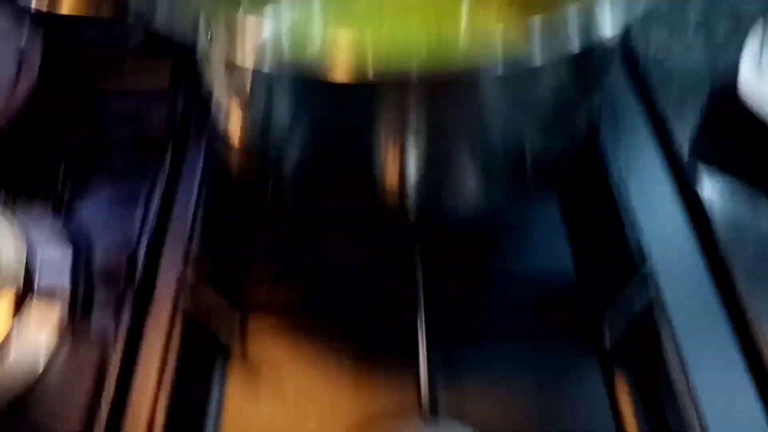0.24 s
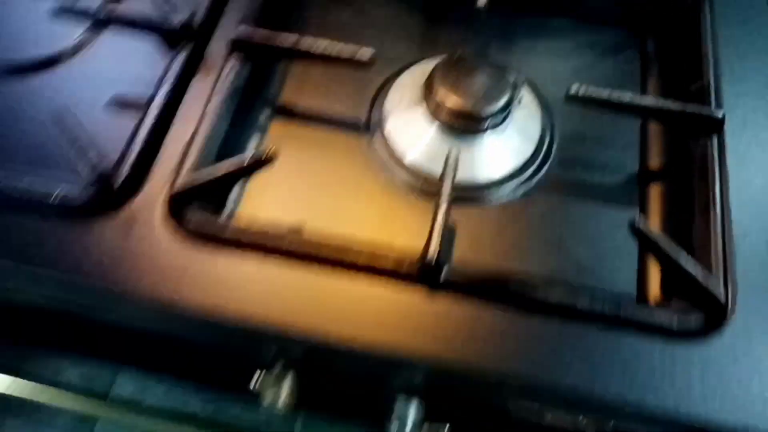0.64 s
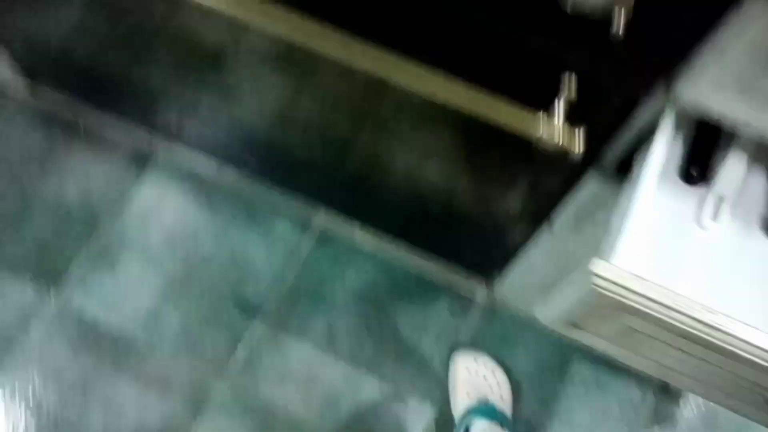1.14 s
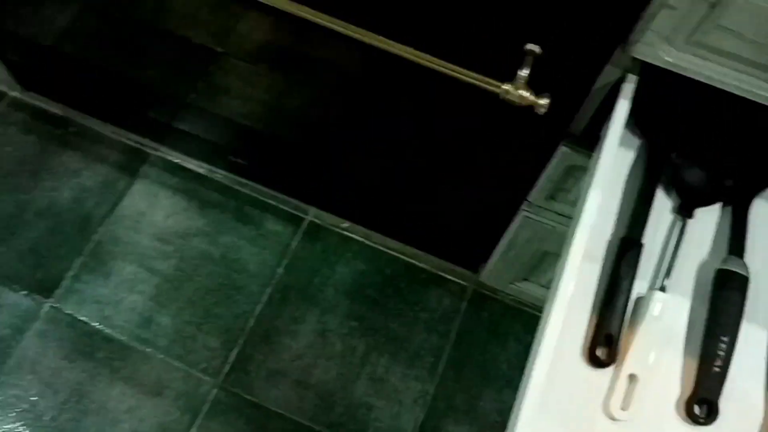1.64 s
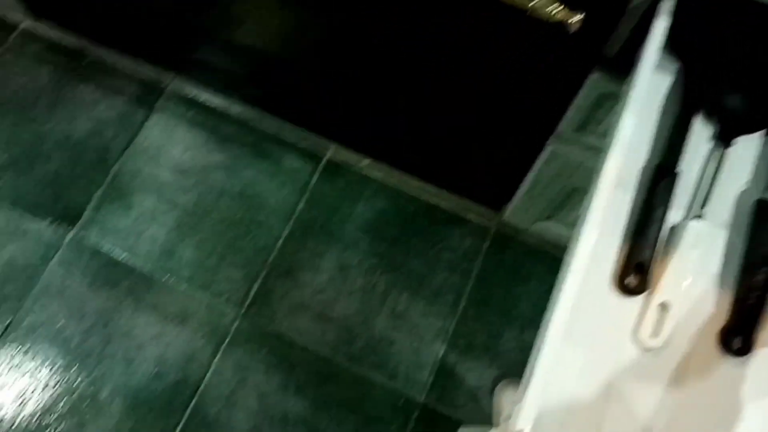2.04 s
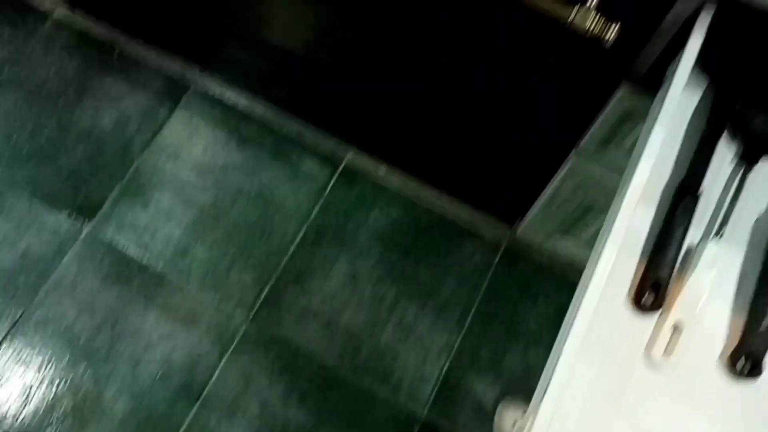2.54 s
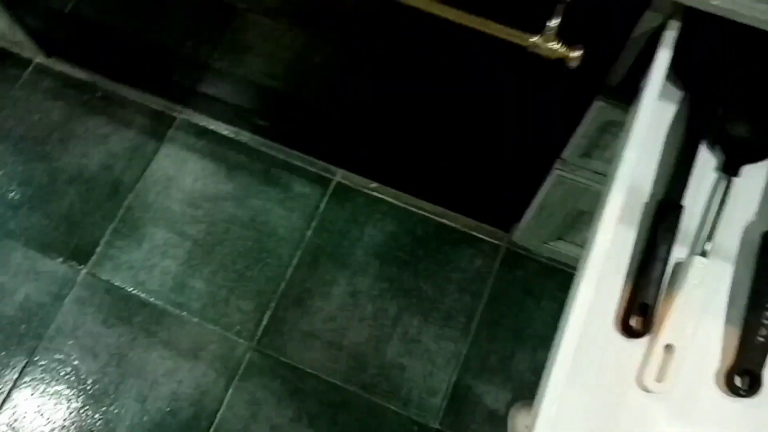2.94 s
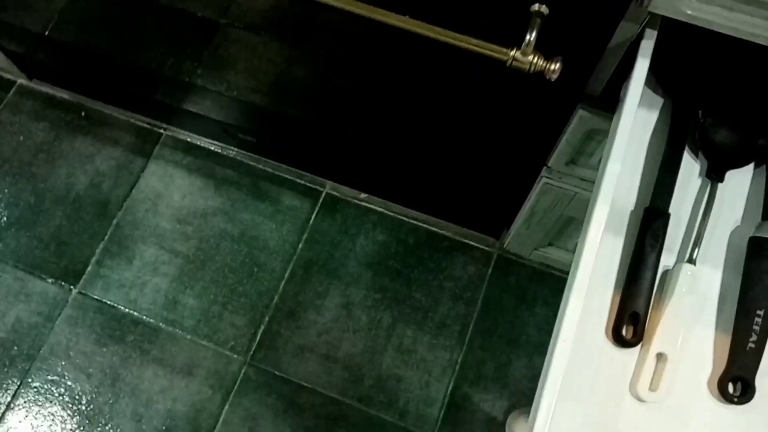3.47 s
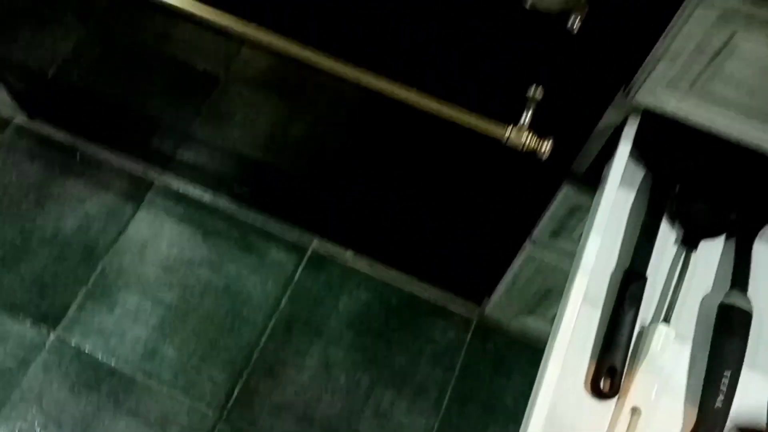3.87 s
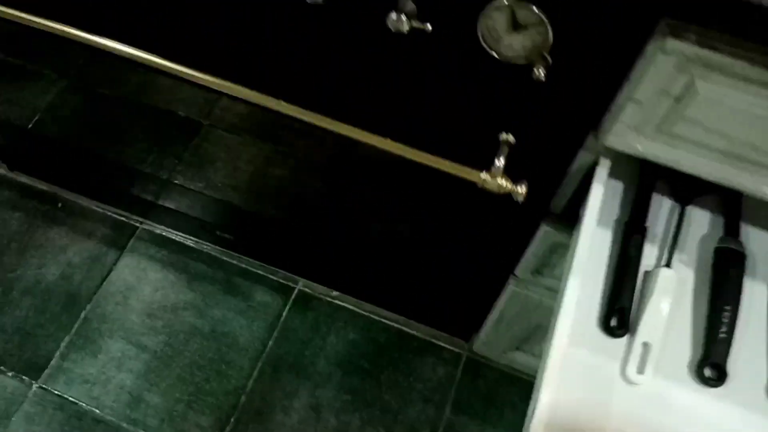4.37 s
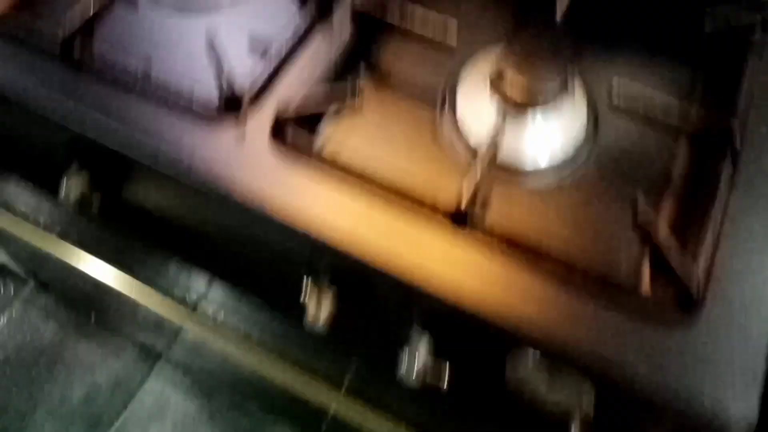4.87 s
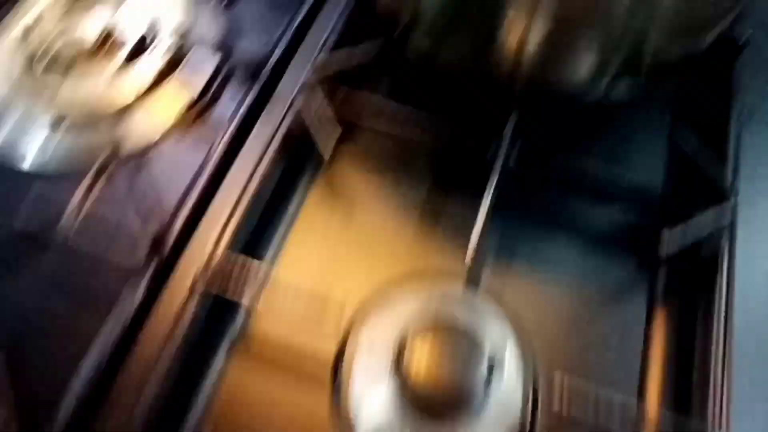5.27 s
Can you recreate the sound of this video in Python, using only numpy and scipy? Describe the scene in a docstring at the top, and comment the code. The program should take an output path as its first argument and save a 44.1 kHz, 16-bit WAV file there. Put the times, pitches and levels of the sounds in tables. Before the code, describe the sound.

In a tiled kitchen with a low electrical hum and faint simmering, a hollow knock sounds and a drawer whirrs open on rollers, jolting to a stop with a clash of utensils. After a pause, a hand rummages lightly in the plastic tray and something is knocked down on wood. The drawer rolls back with more clatter and bumps shut. A hand-held phone picks it up nearby.

```python
"""A tiled kitchen, with a mains hum and a faintly simmering pot, heard by a hand-held phone.
A drawer whirrs open on its rollers and jolts against its stop; utensils slide, clack and clash in their
plastic tray. A hand rummages, something is knocked down on wood, and the drawer rolls back, jolts and
bumps shut with a short hollow clatter. Hits are noise bursts and ringing modes of wood and steel;
friction is a crowd of tiny contacts, and the rollers are narrow noise round a moving pitch."""
import sys
import numpy as np
from scipy import signal
from scipy.fft import rfft, irfft
from scipy.io import wavfile
from scipy.ndimage import uniform_filter1d

SR = 44100
rng = np.random.default_rng(int(sys.argv[2]) if len(sys.argv) > 2 else 0)


def master_out(mix):
    """Clip the mix to full scale and print it as 16-bit PCM to the path in sys.argv[1]."""
    frames = np.transpose(np.atleast_2d(mix))
    ceiling = np.clip(frames, -1, 1)
    pcm = np.round(ceiling * 32767).astype(np.int16)
    wavfile.write(sys.argv[1], SR, pcm)


N = 242991
TIME = np.arange(N) / SR

# room tone, soft air: (frequency [Hz], relative level [dB])
AIR_SPECTRUM = [(25, 2), (70, -8.5), (140, -1.5), (180, -2.5), (225, 5.5), (280, -4), (500, -4),
                (1000, -11.5), (2000, -20), (3500, -27.5), (16000, -33.5)]
# thin hiss on top: (frequency [Hz], relative level [dB])
HISS_SPECTRUM = [(1500, -15), (3500, -5.5), (5200, -1.5), (6500, 9.5), (7900, -7.5), (9300, 8.5),
                 (11000, -3), (13800, -14), (15200, 0.5)]
# a pot simmering on the hob: (frequency [Hz], relative level [dB])
SIMMER_SPECTRUM = [(500, -4), (2600, 5), (4100, 2), (6500, 3), (9000, -1.5), (16000, -33)]
# reverb tail of the tiles: (frequency [Hz], t60 [s])
KITCHEN_DECAY = [(120, 0.67), (400, 0.42), (780, 0.87), (2500, 0.63), (7000, 0.62), (15000, 0.28)]
# EQ of the phone's muffled left port: (frequency [Hz], gain [dB])
LEFT_PORT_EQ = [(50, -10), (100, -0.2), (160, -5.5), (500, -2), (1500, -1), (4000, -1.5), (7000, -3.5),
                (9000, -9.5), (11000, -24.5), (16000, -30)]

# raps of something small, hard and hollow: (time [s], ring [dB], click [dB], sustain [x base t60])
HOLLOW_RAPS = [(.651, -9, -12.5, 2.2), (3.545, -12, -20, .7), (5.202, -11, -23, 1), (5.211, -8.5, -21, 1),
               (5.228, -14, -21, 1)]
# its body: (frequency [Hz], relative level [dB], base t60 [s])
HOLLOW_MODES = [(1128, 9.5, 0.015), (1312, -1, 0.067), (1440, -6.5, 0.085), (1607, 3.5, 0.022),
                (2380, -11, 0.03)]
# its attack: (frequency [Hz], relative level [dB])
CLICK_SPECTRUM = [(700, 9), (1800, -1), (3400, 3), (6000, -4), (16000, -61)]

# utensils hit each other and the tray: (time [s], plastic clack [dB], steel clash [dB])
UTENSIL_HITS = [(0.959, -5.5, -10.5), (1.059, -7, -16.5), (1.099, -9, -20), (1.139, -9, -22),
                (1.238, -10, -22), (1.299, -6.5, -12), (1.351, -13, -3.5), (1.3748, -9, 4),
                (2.913, -15.5, -18.5), (3.542, -27, -8), (4.18, -11, -39), (4.213, -11.5, -13.5),
                (4.243, -30, -10), (4.2486, -21, -1), (4.382, -18, -17), (4.417, -14, -36), (4.589, -10, 1),
                (4.599, -23, -8), (4.611, -17, -7), (4.735, -19, -18)]
# tone of the plastic tray: (frequency [Hz], relative level [dB])
PLASTIC_SPECTRUM = [(300, 0.5), (1500, -1.5), (3000, 1.5), (5000, 0), (6700, 2.5), (7800, -3), (9200, 1.5),
                    (11000, -8.5), (13500, -16), (15300, -8)]
# steel on steel: (frequency [Hz], relative level [dB])
CLASH_SPECTRUM = [(1500, -23), (2700, -36), (4000, -26), (4900, 9), (6000, 4.5), (6700, 14), (7900, 4.5),
                  (9000, 11), (11000, -3), (13000, -27), (15200, -13)]
# the bright crack that opens a clash: (frequency [Hz], relative level [dB])
SNAP_SPECTRUM = [(2000, -34), (5000, 7), (9000, -17), (11500, 10), (13500, -13), (15200, 11)]
# ring of the blades: (frequency before detuning [Hz], relative level [dB])
BLADE_MODES = [(5012, -8), (5469, -10), (6330, 4), (6568, -10), (6730, 1), (7450, -1), (8403, -9),
               (9040, 11)]
# one handle taps another: (time [s], level [dB])
HANDLE_TAPS = [(3.258, -23.5), (3.413, -13.5), (3.422, -16), (4.139, -26.5)]
# the handles' short, dull ring: (frequency [Hz], relative level [dB], t60 [s])
HANDLE_MODES = [(1800, 5, 0.018), (3122, 2.5, 0.035), (3927, 5, 0.022), (4920, 4, 0.015),
                (5820, 8.5, 0.027), (6600, 2, 0.03)]
# the hand drags a utensil over the tray: (start [s], length [s], rubbing [dB], ring [dB])
HAND_SCRAPES = [(2.755, 0.1, -56.5, -82), (2.873, 0.031, -46, -49), (2.972, 0.039, -46, -60),
                (3.333, 0.1, -49.5, -65)]
# ring of the dragged utensil: (frequency [Hz], relative level [dB], t60 [s])
DRAGGED_MODES = [(2040, -0.5, 0.056), (3850, 2, 0.031), (5400, 3, 0.03), (7000, 9, .02)]
# jolts set the whole tray sliding: (time [s], rattle [dB], ring of the phone's microphone port [dB])
TRAY_JOLTS = [(1.39, -33, -66), (3.535, -35.5, -61), (4.594, -29, -28.5)]

# hits on wood: (time [s], knock [dB], boom [dB], panel ring [dB], first rebound gap or 0 for none [s])
WOOD_HITS = [(.651, -10, -11.5, -21, 0.0029), (.911, -8, -22, -29, 0.0064), (.966, -4.5, -34, -13, 0),
             (1.142, -19, -16, -10.5, 0.0068), (1.228, -20, -5, -18, 0.0049),
             (1.389, -8.5, -2.5, -15, 0.016), (3.259, -20, -19.5, -45, 0), (3.526, -4.5, -10, -13, 0.005),
             (3.541, 4, -10, -10, 0), (3.546, -4.5, -11, -14, 0), (4.138, -17, -39, -23, 0),
             (4.213, -11, -8, -16, 0.0047), (4.247, -5, -10.5, -23, 0.0047), (4.589, -2, 1, -12, 0.0097),
             (4.68, -19, -6, -14, 0.025), (5.201, -3.5, -17, -22, 0), (5.213, -1.5, -5, -10, 0.008)]
# dry knock of wood: (frequency [Hz], relative level [dB])
WOOD_SPECTRUM = [(70, -22), (165, 10.5), (400, 3), (560, 5), (1300, -5.5), (2100, -3.5), (3200, -16),
                 (6000, -18), (10000, -25), (16000, -44)]
# hollow boom of the cabinet: (frequency [Hz], relative level [dB], t60 [s])
CABINET_MODES = [(152.4, -12, 0.36), (170.6, -0.5, 0.13), (213, 11, 0.08), (240.3, 2, 0.075),
                 (267.2, -2, 0.17), (310, 3, 0.081), (427.6, 1.5, 0.16), (516, -3, 0.22)]
# ring of a wooden panel: (frequency [Hz], relative level [dB], t60 [s])
PANEL_MODES = [(407, 0.5, 0.081), (667, 9.5, 0.072), (917, 10, 0.041), (1066, 8, 0.051), (1262, 2.5, 0.057),
               (1514, 5.5, 0.05)]
# the drawer box is jarred by the hand, a catch or a stop: (time [s], level [dB])
BOX_SLAMS = [(1.328, -5.5), (1.399, -3.5), (3.258, -17), (3.529, -7.5), (4.598, 3.5), (4.6107, 4),
             (4.633, 0.5)]
# body of that box: (frequency [Hz], relative level [dB], t60 [s])
BOX_MODES = [(156, -5.5, .13), (216, 5, 0.048), (255, 0, 0.073), (315, -6, .1), (423, -2.5, .07)]
# the drawer's whole weight bumps on its rails: (time [s], level [dB])
RAIL_THUMPS = [(1.23, -7), (1.388, -.5), (3.916, -15), (4.043, -12), (4.187, -6), (5.216, -9)]
# low end of those bumps: (frequency [Hz], relative level [dB], t60 [s])
THUMP_MODES = [(72.5, 1.1, 0.047), (83.9, 3.8, 0.2), (111, 7.6, 0.053), (171.6, 2.3, 0.19)]
# hard knocks wake sheet metal nearby: (time [s], level [dB])
SHEET_HITS = [(3.541, -4), (4.592, -16), (5.213, -17)]
# its faint ring: (frequency [Hz], relative level [dB], t60 [s])
SHEET_MODES = [(657, -1, 0.17), (720, -1, 0.27), (763, -1, 0.3), (890, -4, 0.31)]

# pulls, nudges and shoves of the drawer: (start [s], length [s], starting roller pitch [Hz],
# speed lost by the end [0-1], relative whirr [dB], grinding [dB], utensil rattle [dB])
DRAWER_STROKES = [(.92, 0.093, 290, 0.02, -39.5, -41.5, -43.5),
                  (1.06, 0.086, 301.2, 0.07, -35.5, -39.5, -57), (1.17, 0.13, 278, 0.07, -36, -39, -43.5),
                  (1.325, 0.022, 235, 0.02, -34.5, -49.5, -57), (3.98, 0.14, 280.3, 0.06, -44.5, -61, -75),
                  (4.25, 0.029, 276, 0.2, -39, -43, -47.5), (4.36, 0.12, 268, 0, -35.5, -51.5, -50),
                  (4.62, .15, 305, 0.03, -38, -42, -45), (4.85, 0.2, 276.4, 0.03, -45.5, -50.5, -79)]
# grit in the runners: (frequency [Hz], relative level [dB])
GRIT_SPECTRUM = [(50, -24), (140, -2), (300, -0.5), (390, 2.5), (520, 4.5), (660, -1.5), (850, 3.5),
                 (1300, 0), (2200, -8), (3500, -22), (8000, -21.5), (16000, -97)]

STROKE_RISE_S, STROKE_COAST_S = 0.45, 0.53  # time to gain and to lose 60 dB


def amp(db):
    """Decibels to gain."""
    return 10 ** (np.asarray(db) / 20)


def decay(t, t60):
    """Envelope that falls 60 dB in t60 seconds."""
    return np.exp(-np.log(1000) * t / t60)


def on_log_axis(hz, points):
    """Read a (frequency [Hz], value) curve at any frequency."""
    f, value = np.transpose(points)
    return np.interp(np.log(hz + 1), np.log(f), value)


def convolve(x, response):
    """Play a sound through a response, channel by channel."""
    return signal.fftconvolve(np.atleast_2d(x), np.atleast_2d(response), axes=1)[:, :N]


def unit(response):
    """Scale a response to unit energy."""
    return response / np.sqrt(np.mean(np.sum(response ** 2, axis=-1)))


def colour(points, size=4096):
    """Minimum-phase response of an EQ curve."""
    gain = amp(on_log_axis(np.fft.rfftfreq(size, 1 / SR), points))
    cepstrum = irfft(np.log(gain))
    cepstrum[1:size // 2] *= 2
    cepstrum[size // 2 + 1:] = 0
    return irfft(np.exp(rfft(cepstrum)))


def shaped(x, spectrum):
    """Give a sound a tone colour through a unit-energy EQ."""
    return convolve(x, unit(colour(spectrum)))


def ring(modes, turn=-1, size=22050):
    """Decaying sines of a struck body; mode k is weighted by turn ** k, so -1 alternates polarity."""
    t = TIME[:size]
    return unit(sum(turn ** k * amp(db) * np.sin(2 * np.pi * hz * t) * decay(t, t60)
                    for k, (hz, db, t60) in enumerate(modes)))


def diffuse(size, alike_hz=650):
    """Stereo noise: centred in the bass, wide in the treble."""
    shared, left, right = rfft(rng.standard_normal((3, size)))
    likeness = 1 / (1 + (np.fft.rfftfreq(size, 1 / SR) / alike_hz) ** 2)
    return irfft(np.sqrt(likeness) * shared + np.sqrt(1 - likeness) * np.array([left, right]), size)


def walk(rate):
    """Smooth random wander with a spread of 1."""
    hold = int(SR / rate)
    steps = np.repeat(rng.standard_normal(N // hold + 1), hold)
    smooth = uniform_filter1d(uniform_filter1d(steps, hold), hold)[:N]
    return smooth / smooth.std()


def grains(rate, spread_db):
    """Tiny contacts of random timing and size, rms 1."""
    ticks = (rng.random(N) < rate / SR) * rng.choice([-1, 1], N)
    ticks = ticks * amp(spread_db * np.clip(rng.standard_normal(N), -2, 2))
    return ticks / ticks.std()


def rasp(rate, spread_db, grain_s):
    """Friction: a crowd of tiny contacts, each a puff of noise that dies at once; rms 1."""
    power = np.abs(convolve(grains(rate, spread_db) ** 2, np.exp(-TIME[:2000] / grain_s)))
    return diffuse(N) * np.sqrt(power / power.mean())


def whirr(hz):
    """A rough, wavering tone: narrow noise round a moving pitch, rms 1."""
    phase = 2 * np.pi * np.cumsum(hz * (1 + 0.03485 * walk(25))) / SR
    return walk(110) * np.cos(phase) + walk(110) * np.sin(phase)


def impulses(times, dbs):
    """One clean impulse for each hit."""
    force = np.zeros(N)
    force[(np.asarray(times) * SR).astype(int)] = amp(dbs)
    return force


def scatter(t60, direct_db, rise_s=0.0026, size=6000):
    """A first wave front, then the dense short rattle of nearby panels."""
    t = TIME[:size]
    response = unit(diffuse(size) * (1 - np.exp(-t / rise_s)) * decay(t, t60))
    response[:, 0] += amp(direct_db)
    return unit(response)


def blows(times, dbs, t60, direct_db):
    """Noisy transients: each hit lands elsewhere, so each scatters in its own way."""
    track = np.zeros((2, N + SR))
    for s, db in zip(times, dbs):
        burst, start = scatter(t60, direct_db), int(s * SR)
        track[:, start:start + burst.shape[1]] += amp(db) * burst
    return track[:, :N]


def struck(s, db, modes, t60, direct_db):
    """One scattered hit rings an object's modes."""
    burst = convolve(scatter(t60, direct_db), ring(modes))
    return amp(db) * np.pad(burst, ((0, 0), (int(s * SR), N)))[:, :N]


def swell(start, length, rise_s, fall_s):
    """Envelope of one movement: fade in up to its start, hold, release."""
    early, late = np.maximum(start - TIME, 0), np.maximum(TIME - start - length, 0)
    return decay(early, rise_s) * decay(late, fall_s)


def movements(starts, lengths, dbs, rise_s, fall_s):
    """Envelope of a series of movements; where they overlap their powers add."""
    return np.sqrt(sum((amp(db) * swell(s, length, rise_s, fall_s)) ** 2
                       for s, length, db in zip(starts, lengths, dbs)))


def background():
    """The bed: an appliance hums at twice the mains frequency over air, hiss and a faint simmer."""
    air = shaped(diffuse(N), AIR_SPECTRUM) * amp(-50.5 + .5 * walk(6.08))
    hiss = shaped(diffuse(N), HISS_SPECTRUM) * amp(-60.5)
    # the pot is heard only while the phone is over the hob
    simmer_db = np.interp(TIME, [0, .9, 4.9, 5.5], [-56, -95, -58, -58])
    simmer = shaped(diffuse(N), SIMMER_SPECTRUM) * amp(simmer_db)
    hum = np.sqrt(2) * np.sin(2 * np.pi * 100.2 * TIME) * amp(-45 + 0.29 * walk(5.35))
    return hum + air + hiss + simmer


def kitchen_reverb(x, build_s=0.0024, size=44100):
    """Reflections off the tiles build up briefly; the top end dies first."""
    t, hz = TIME[:size], np.fft.rfftfreq(size, 1 / SR)
    centres = np.geomspace(100, 16000, 9)
    noise, tail = rfft(diffuse(size)), 0
    for centre, pick in zip(centres, np.eye(len(centres))):
        band = irfft(noise * np.interp(np.log(hz + 1), np.log(centres), pick), size)
        tail = tail + band * decay(t, on_log_axis(centre, KITCHEN_DECAY))
    return convolve(x, unit(tail * (1 - np.exp(-t / build_s))))


def raps():
    """A hard click and a hollow ring, longer when the object is free; a flurry makes a clatter."""
    times, _, click_db, _ = np.transpose(HOLLOW_RAPS)
    sound = shaped(blows(times, click_db, t60=.022, direct_db=-8), CLICK_SPECTRUM)
    for s, ring_db, _, sustain in HOLLOW_RAPS:
        modes = [(hz, db, t60 * sustain) for hz, db, t60 in HOLLOW_MODES]
        sound += struck(s, ring_db, modes, t60=0.019, direct_db=2.5)
    return sound


def jangle(ring_db=-15, ring_t60_s=0.061, detune=.012):
    """Every clash rings other blades, so the faint ring is tuned a little differently each time."""
    sound = np.zeros((2, N))
    for s, _, steel_db in UTENSIL_HITS:
        ratios = 1 + detune * rng.standard_normal(len(BLADE_MODES))
        modes = [(hz * ratio, db, ring_t60_s) for (hz, db), ratio in zip(BLADE_MODES, ratios)]
        sound += struck(s, steel_db + ring_db, modes, t60=0.018, direct_db=-12)
    return sound


def agitation():
    """Envelopes: utensils sliding (drawer, hand, jolts), the dragged one's ring, the mic port's ring."""
    start, length, *_, rattle_db = np.transpose(DRAWER_STROKES)
    shaken = movements(start, length, rattle_db, STROKE_RISE_S, STROKE_COAST_S)
    start, length, rub_db, ring_db = np.transpose(HAND_SCRAPES)
    stirred, dragging = (movements(start, length, db, rise_s=0.17, fall_s=0.15)
                         for db in (rub_db, ring_db))
    times, jolt_db, port_db = np.transpose(TRAY_JOLTS)
    jolted, port_drive = (movements(times, np.zeros_like(times), db, rise_s=0.12, fall_s=0.13)
                          for db in (jolt_db, port_db))
    sliding = np.sqrt(shaken ** 2 + stirred ** 2 + jolted ** 2)
    return sliding, dragging, port_drive


def utensils():
    """Handles slide and clack in the plastic tray; blades crack, clash brightly and ring on."""
    times, clack_db, steel_db = np.transpose(UTENSIL_HITS)
    sliding, dragging, port_drive = agitation()
    friction = rasp(rate=470, spread_db=0.5, grain_s=0.0032)
    clacks = blows(times, clack_db, t60=0.14, direct_db=-9.5)
    plastic = shaped(friction * sliding + clacks, PLASTIC_SPECTRUM)
    clashes = blows(times, steel_db, t60=.028, direct_db=-7)
    snap_db = -7 + 0.75 * steel_db  # the crack grows more slowly than the clash
    snaps = blows(times, snap_db, t60=.02, direct_db=-8)
    steel = shaped(clashes, CLASH_SPECTRUM) + shaped(snaps, SNAP_SPECTRUM) + jangle()
    taps = blows(*np.transpose(HANDLE_TAPS), t60=0.057, direct_db=-3.5)
    handles = convolve(taps, ring(HANDLE_MODES))
    dragged = convolve(friction * dragging, ring(DRAGGED_MODES))
    # jolts and clashes set off a thin, very high ring in the phone's microphone port
    port_ring = convolve(friction * port_drive + amp(-14.5) * clashes, ring([(15700, 0, 0.0009)]))
    return plastic + steel + handles + dragged + port_ring


def rebounds(contacts=4, gap_ratio=.92, step_db=3.5):
    """Every contact of the hits on wood: a loose part strikes again, sooner and weaker each time."""
    for s, knock_db, boom_db, panel_db, gap in WOOD_HITS:
        for k in range(contacts if gap > 0 else 1):
            loss_db = step_db * k
            yield s, knock_db - loss_db, boom_db - loss_db, panel_db - loss_db
            s += gap * gap_ratio ** k


def woodwork(low_cut_hz=96):
    """Hits on wood: dry knock, hollow boom, panel ring, the drawer's thump and a hint of sheet metal."""
    times, knock_db, boom_db, panel_db = np.transpose(list(rebounds()))
    knock = shaped(blows(times, knock_db, t60=.038, direct_db=-3), WOOD_SPECTRUM)
    cabinet = convolve(impulses(times, boom_db), ring(CABINET_MODES, turn=0.89))
    box = convolve(impulses(*np.transpose(BOX_SLAMS)), ring(BOX_MODES, turn=1))
    # the cabinet's panels radiate little deep bass
    low_cut = signal.butter(2, low_cut_hz, "highpass", fs=SR, output="sos")
    boom = signal.sosfilt(low_cut, cabinet + box)
    panel = convolve(impulses(times, panel_db), ring(PANEL_MODES))
    thump = convolve(impulses(*np.transpose(RAIL_THUMPS)), ring(THUMP_MODES))
    metal = convolve(impulses(*np.transpose(SHEET_HITS)), ring(SHEET_MODES))
    return knock + boom + panel + thump + metal


def groan(start_s=1.005, length_s=0.0263, start_hz=607, sag_hz_per_s=3360):
    """A runner rubs roughly as the drawer comes free; its pitch sinks as more rail comes out."""
    hz = start_hz - sag_hz_per_s * np.clip(TIME - start_s, 0, length_s)
    return amp(-35) * whirr(hz) * swell(start_s, length_s, STROKE_RISE_S, fall_s=0.15)


def roller_pitch(braking_power=3.9):
    """Each stroke starts at its own speed and slows towards its end, later for a higher power."""
    hz = np.full(N, float(DRAWER_STROKES[0][2]))
    for start, length, pitch_hz, lost, *_ in DRAWER_STROKES:
        progress = np.clip((TIME - start) / length, 0, 1)
        hz = np.where(TIME >= start, pitch_hz * (1 - lost * progress ** braking_power), hz)
    return hz


def runners():
    """Rollers whirr at a pitch that follows the drawer's speed and grind over grit in the rails."""
    start, length, _, _, whirr_db, grind_db, _ = np.transpose(DRAWER_STROKES)
    rolling, grinding = (movements(start, length, db, STROKE_RISE_S, STROKE_COAST_S)
                         for db in (whirr_db, grind_db))
    rolling *= amp(3 * walk(rate=19))  # the drawer runs in fits and starts
    hz = roller_pitch()
    low_tone = amp(-3) * whirr(hz) * rolling
    high_tone = amp(-9.5) * whirr(1.85 * hz) * grinding  # comes out when the rollers grind hard
    # bumps in the rails shake the cabinet as well
    bumps = grains(rate=150, spread_db=4.5) * rolling
    rumble = amp(-7.5) * convolve(bumps, ring(CABINET_MODES, turn=0.92))
    grit = rasp(rate=470, spread_db=5, grain_s=0.0029) * grinding
    grind = shaped(grit, GRIT_SPECTRUM) + amp(-23) * convolve(grit, ring(PANEL_MODES))
    return low_tone + high_tone + groan() + rumble + grind


def scene():
    """The mix: drawer, wood, raps and utensils, each with its own reverb send, over the bed."""
    rolling, wood, hollow, cutlery = runners(), woodwork(), raps(), utensils()
    send = amp(-4) * rolling + amp(-5.5) * wood + amp(-6.5) * hollow + amp(-9) * cutlery
    return rolling + wood + hollow + cutlery + kitchen_reverb(send) + background()


def record(dry):
    """The left port hears everything first but is muffled; the phone cuts the sub-bass and the top."""
    right_lag_s, bottom_hz, top_hz = .00063, 55, 15700
    left = convolve(dry[0], colour(LEFT_PORT_EQ))[0]
    right = np.pad(dry[1], (round(right_lag_s * SR), 0))[:N]
    low_pass = signal.ellip(10, .2, 80, top_hz, fs=SR, output="sos")
    high_pass = signal.butter(3, bottom_hz, "highpass", fs=SR, output="sos")
    return signal.sosfilt(low_pass, signal.sosfilt(high_pass, np.array([left, right])))


dry = scene()
out = record(dry)
master_out(out)
```